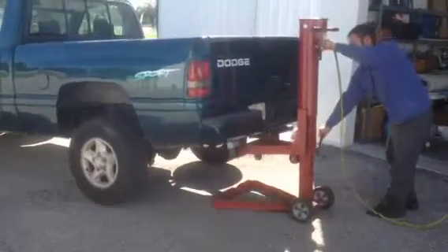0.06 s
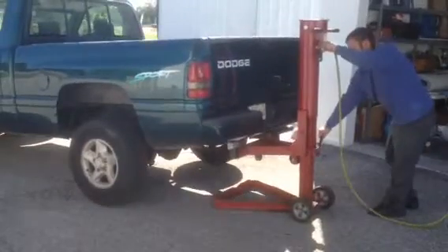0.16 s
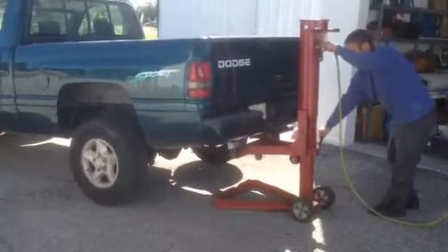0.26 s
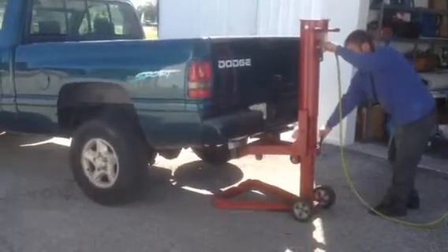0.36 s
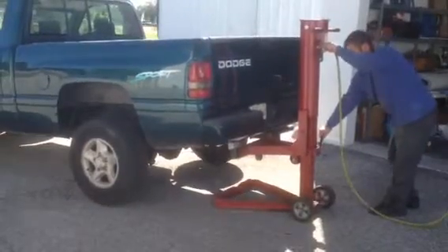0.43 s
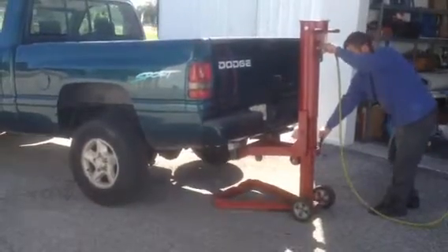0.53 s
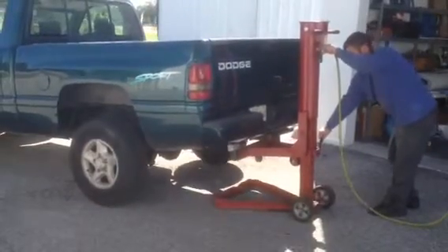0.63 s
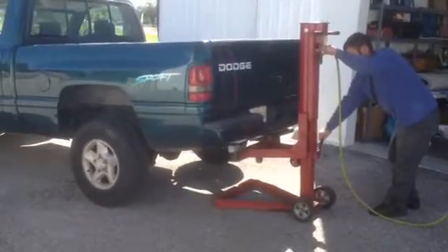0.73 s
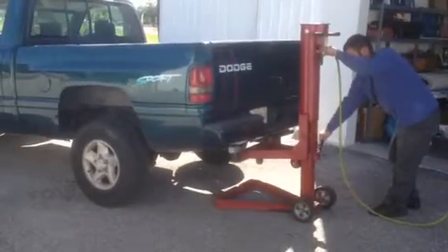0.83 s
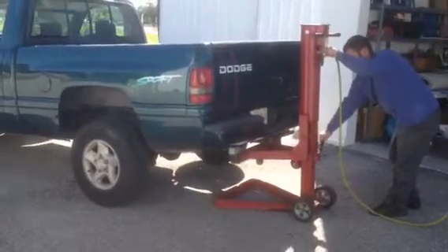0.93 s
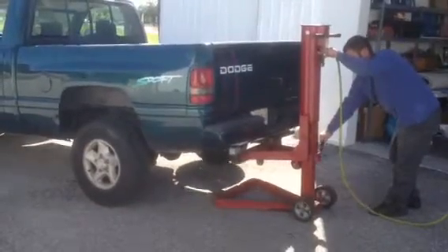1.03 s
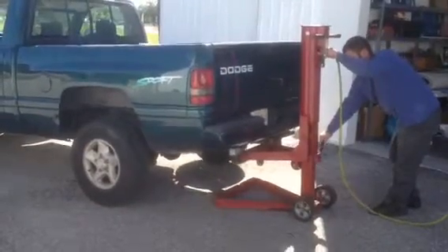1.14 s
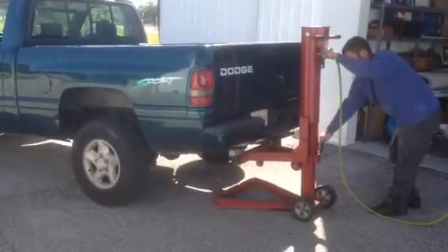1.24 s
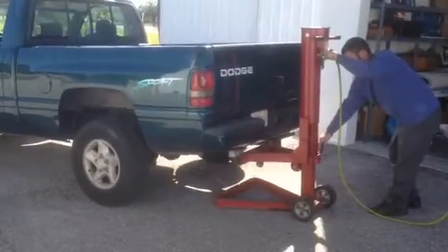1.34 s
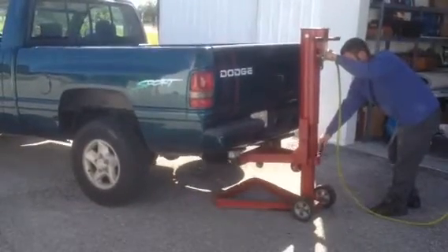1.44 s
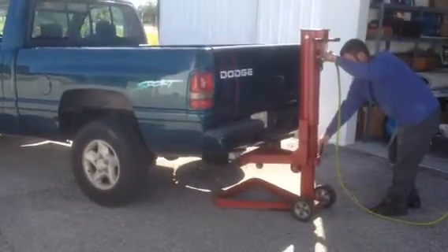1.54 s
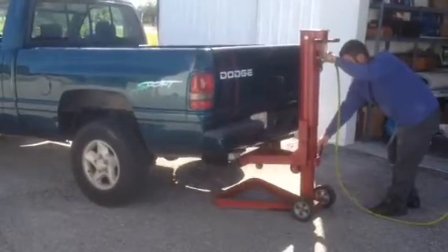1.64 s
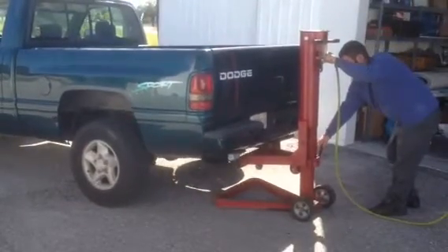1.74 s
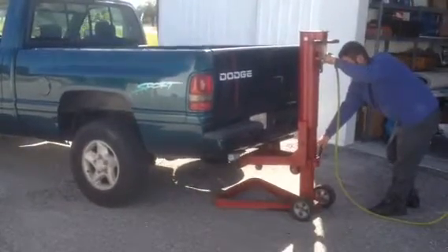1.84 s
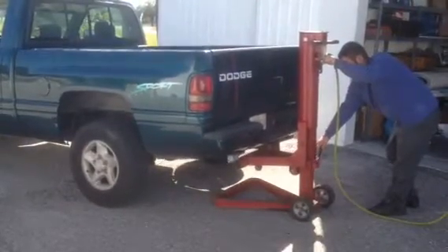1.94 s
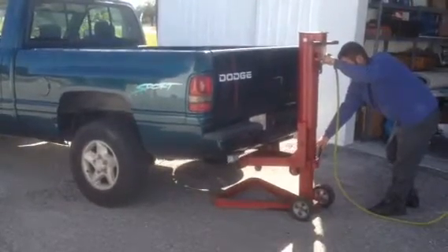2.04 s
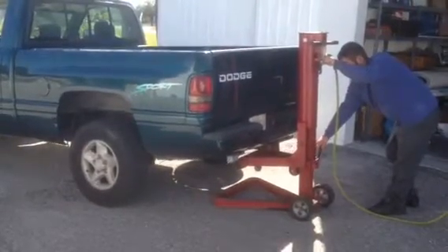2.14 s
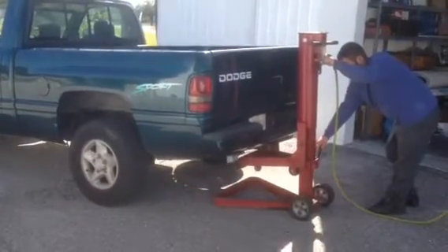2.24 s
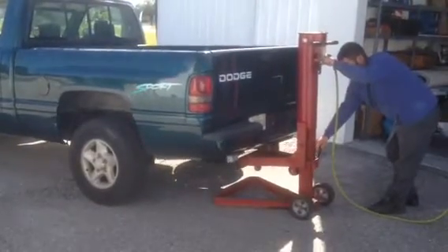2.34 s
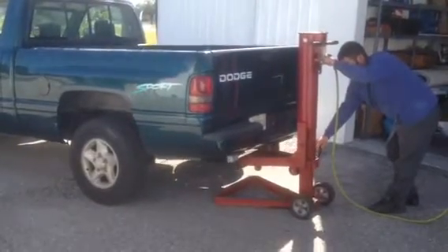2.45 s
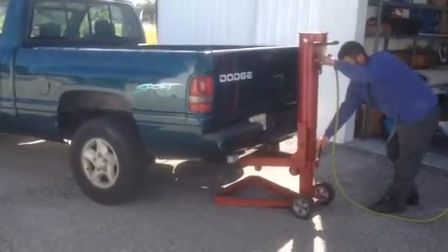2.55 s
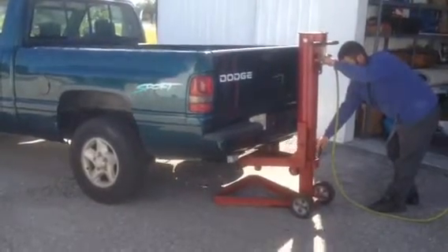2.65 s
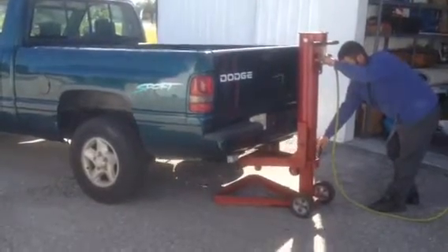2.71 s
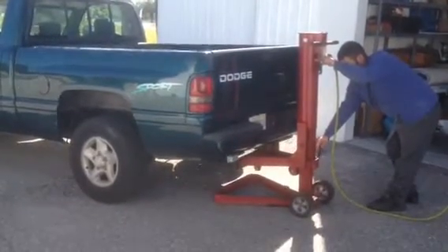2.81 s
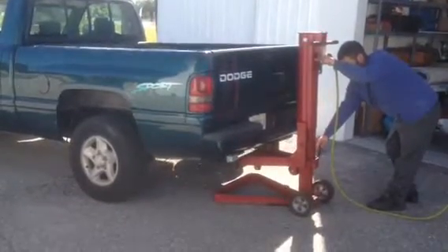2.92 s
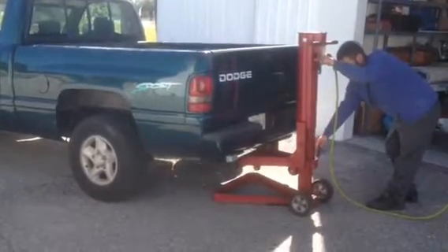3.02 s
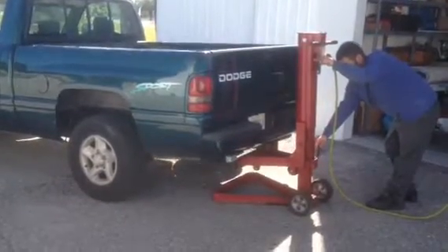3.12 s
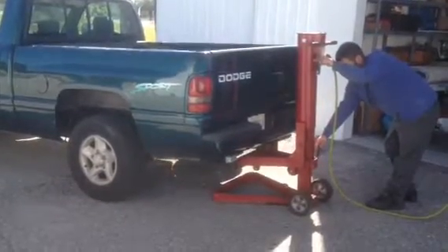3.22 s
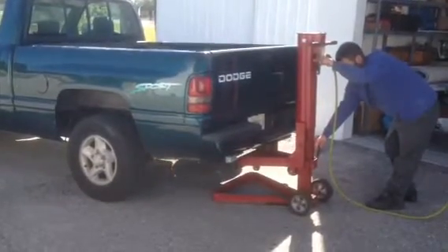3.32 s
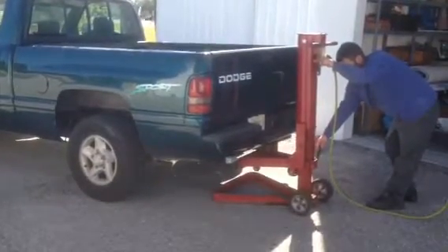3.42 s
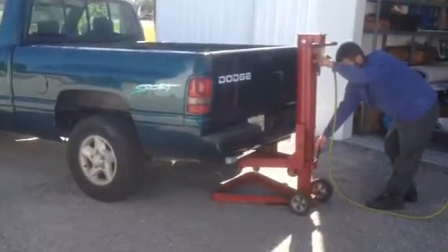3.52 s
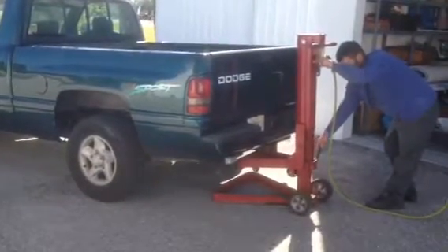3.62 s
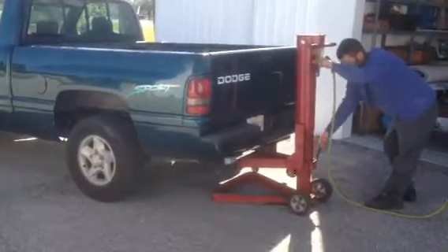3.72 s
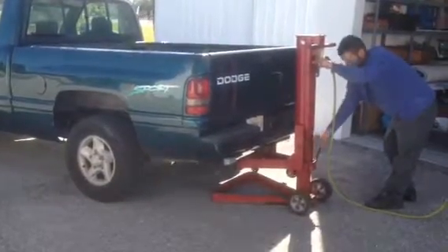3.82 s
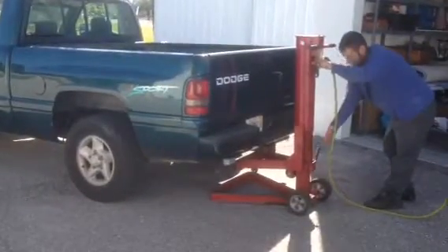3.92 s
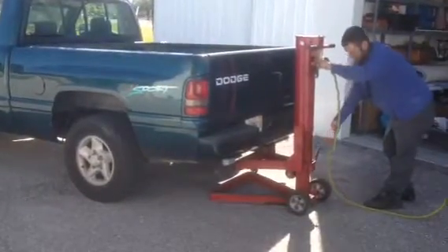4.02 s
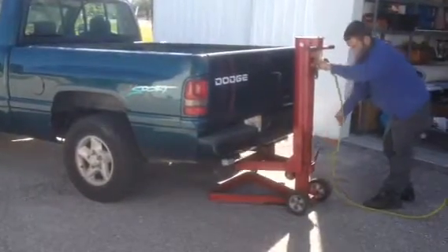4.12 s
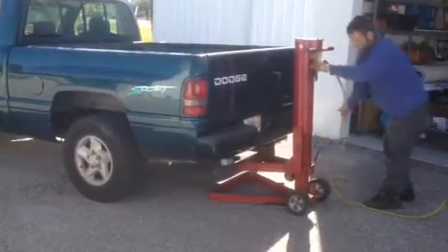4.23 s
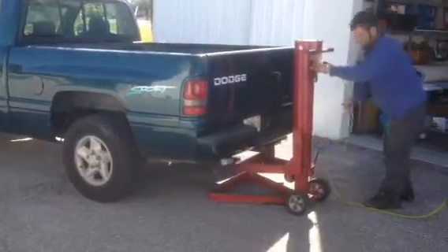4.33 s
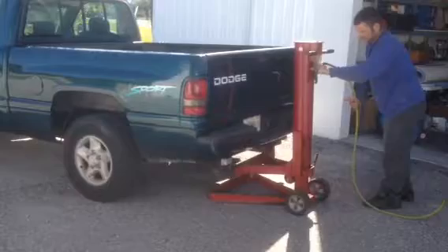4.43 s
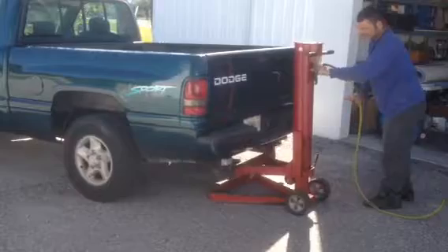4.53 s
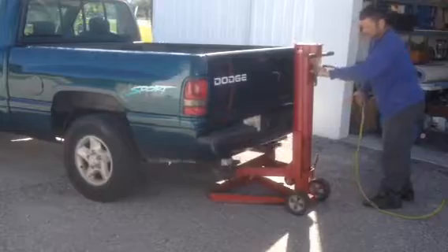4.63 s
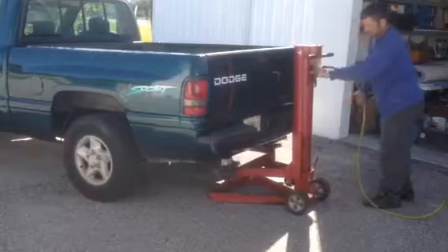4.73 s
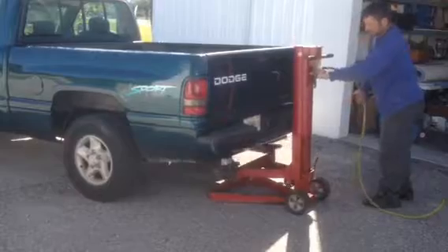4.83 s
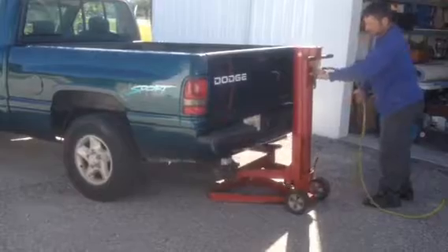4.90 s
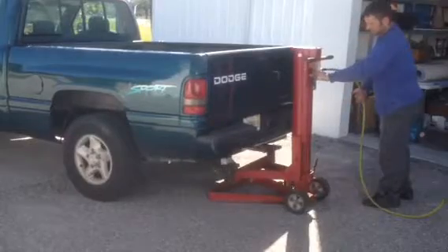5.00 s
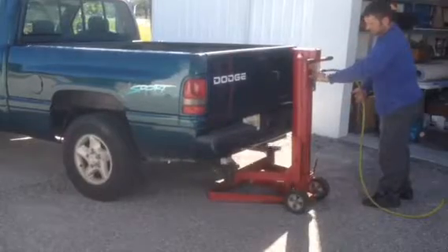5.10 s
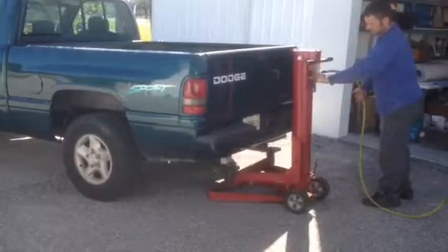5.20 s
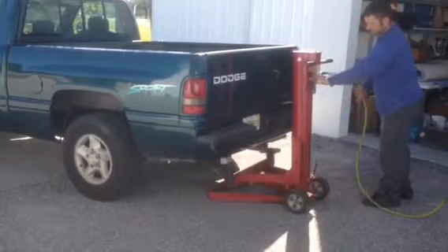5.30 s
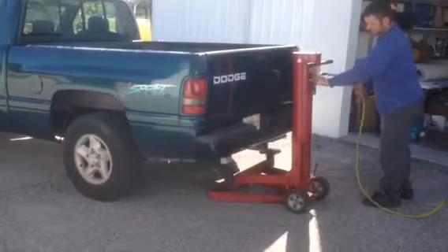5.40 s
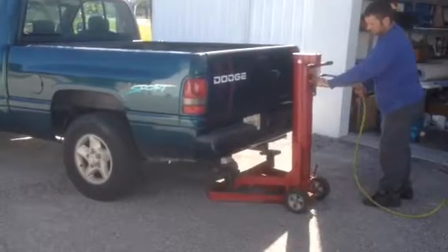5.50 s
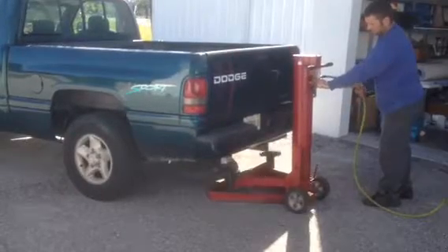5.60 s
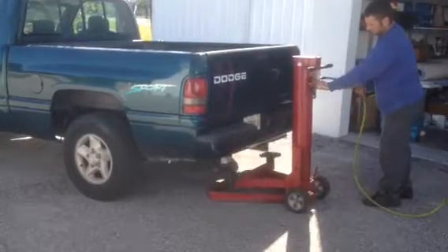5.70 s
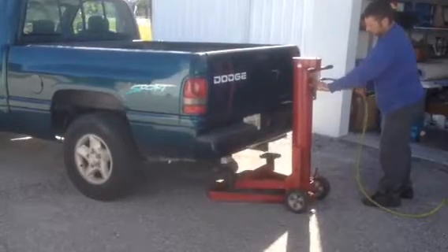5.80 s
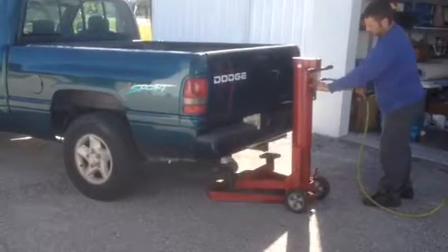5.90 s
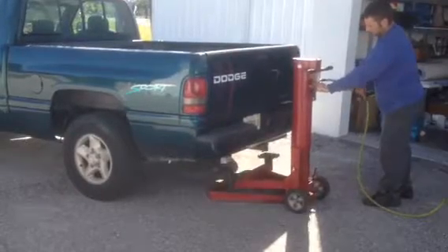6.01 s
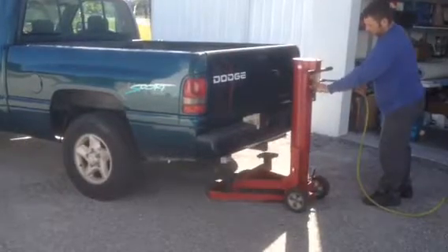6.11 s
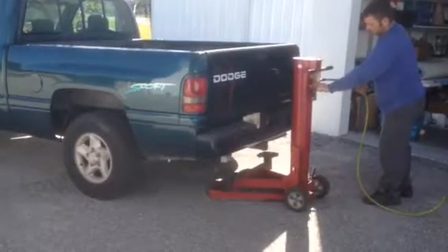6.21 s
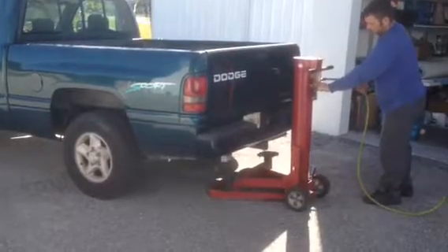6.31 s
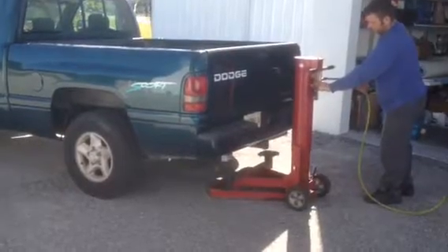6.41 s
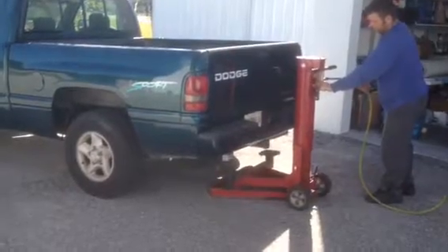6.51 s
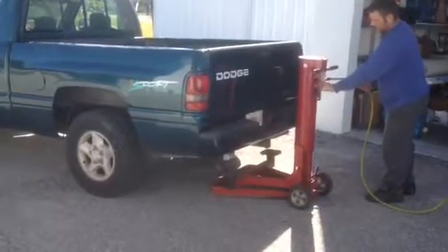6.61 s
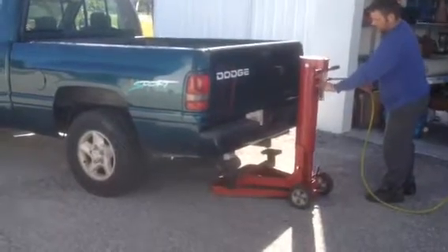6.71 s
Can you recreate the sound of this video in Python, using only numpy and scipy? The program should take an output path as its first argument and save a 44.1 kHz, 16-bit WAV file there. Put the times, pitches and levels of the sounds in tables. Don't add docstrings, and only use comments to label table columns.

```python
import sys
import numpy as np
from scipy import signal
from scipy.fft import rfft, irfft
from scipy.io import wavfile
from scipy.ndimage import uniform_filter1d

SR = 44100
rng = np.random.default_rng(int(sys.argv[2]) if len(sys.argv) > 2 else 0)


def boost(x):
    u = np.asarray(x, float) / 20
    return 10 ** u


def bounce(signal):
    frames = np.transpose(np.atleast_2d(signal))
    limited = np.clip(frames, -1, 1)
    pcm = np.round(limited * 32767).astype(np.int16)
    wavfile.write(sys.argv[1], SR, pcm)


N = 297675
T = np.arange(N) / SR
HZ = np.maximum(np.arange(N // 2 + 1) * SR / N, 1)
FRAME = 2048
TOUCHDOWN_S, STOP_S = 3.75, 5.9


def unit(x):
    return x / np.sqrt(np.mean(x ** 2))


def curves(table, at=T):
    s, *columns = np.transpose(table)
    return [np.interp(at, s, column) for column in columns]


def colour(points, at=HZ):
    hz, db = np.transpose(points)
    return boost(np.interp(np.log(at), np.log(hz), db, left=-90, right=db[-1]))


def walk(rate):
    hold = int(SR / rate)
    steps = np.repeat(rng.standard_normal(N // hold + 1), hold)
    return unit(uniform_filter1d(uniform_filter1d(steps, hold), hold)[:N])


def cycles_at(table):
    total = 0
    for s, db, hz, cycles in table:
        swell = np.exp(-(2.6 * (T - s) * hz / cycles) ** 2)
        total = total + boost(db) * np.cos(2 * np.pi * hz * (T - s)) * swell
    return total


def yard():
    # hz, level_db
    spectrum = [(250, -28), (330, -9), (600, -3), (950, -8), (1300, -2.5), (1450, -1.5), (2000, -7.5),
                (3000, -16), (3600, -20), (4300, -16), (4750, -7.5), (5100, -14), (5700, -17), (7200, -15),
                (8400, -24), (13100, -18), (15300, -24)]
    far = rfft(unit(irfft(rfft(rng.standard_normal(N)) * colour(spectrum), N)))
    low = 1 / (1 + (HZ / 1300) ** 4)
    rise_db = 46 * np.maximum(T - 6.5, 0)
    hum = irfft(far * low, N) * boost(.35 * rise_db)
    hiss = irfft(far * (1 - low), N) * boost(rise_db)
    return (hum + hiss) * boost(-49.5 + 0.6 * walk(10))


def wind():
    # hz, level_db
    buffet = [(15, -67), (25, -32), (81, -11), (183, 2.5), (236, -0.5), (271, -2.5), (352, -6.5),
              (464, -17), (500, -21), (650, -45), (1100, -120)]
    # peak_s, peak_db, half_length_s
    gust_table = [(0.094, -54, 0.038), (.19, -44, 0.039), (0.26, -46, .03), (0.344, -47.5, .045),
                  (0.453, -51.5, 0.021), (.88, -55, 0.13), (1.238, -55, 0.025), (1.503, -57, 0.018),
                  (2.025, -61, .04), (2.77, -59, 0.053), (3.08, -61, .04), (3.3, -63, .05), (3.7, -69, 0.2),
                  (4.102, -58, 0.092), (4.3, -67, 0.091), (4.8, -66, .3), (5.103, -57, .03),
                  (5.22, -57, 0.022), (5.41, -61, .03), (5.8, -67, .3), (6.258, -55, 0.075),
                  (6.437, -61, 0.1), (6.59, -53, 0.04), (6.688, -48, 0.06)]
    lumps = rfft(rng.standard_normal(N) * boost(2.2 * walk(35))) * colour(buffet) * (HZ < 700)
    gusts = 0
    for s, db, half in gust_table:
        gusts = gusts + boost(db) * np.maximum(1 - ((T - s) / (2 * half)) ** 2, 0) ** 4
    breeze = unit(irfft(lumps, N)) * boost(-59.5 + 1.5 * walk(6))
    whistle = unit(irfft(lumps / (1 + (115 / HZ) ** 2), N))
    return breeze + whistle * gusts


def puffs():
    # peak_s, peak_db, pitch_hz, cycles
    table = [
        (6.536, -42, 150, 1.5),
        (6.581, -36, 180, 2.2),
        (6.6, -43, 230, 2.2),
        (6.66, -32, 210, 2.4),
        (6.671, -42, 190, 1.8),
        (6.684, -33, 180, 2.8),
        (6.698, -38, 170, 1.5),
        (6.717, -38, 140, 1.8),
        (6.742, -41, 150, 1.8),
    ]
    return cycles_at(table)


def more_puffs():
    # peak_s, peak_db, pitch_hz, cycles
    table = [(.004, -56, 40, .6), (.15, -58, 35, .7), (1.185, -55, 90, 1.6), (1.265, -66, 35, .7),
             (1.495, -59, 40, .7), (2.1, -64, 45, .7), (4.63, -55, 190, 5), (5.08, -53, 185, 6),
             (3.62, -60, 75, 1.1), (2.23, -60, 75, 1.2), (2.775, -46, 160, 4), (2.82, -56, 80, 1.2),
             (3.115, -49, 200, 5), (3.3, -50, 180, 7), (6.63, -58, 50, .8), (5.2, -64, 45, .7),
             (5.8, -63, 45, .7), (.096, -43, 176, 5.7), (.165, -46, 190, 4), (0.196, -44, 265, 5),
             (.365, -44, 190, 5.5), (.785, -52, 180, 5), (.885, -53, 165, 5), (1.01, -54, 165, 5),
             (1.245, -53, 130, 2)]
    return cycles_at(table)


def plates():
    # peak_s, peak_db, pitch_hz, cycles
    table = [(4.055, -40, 441, 18), (4.05, -37, 720, 14), (4.075, -41, 630, 24), (4.08, -45, 250, 9),
             (6.17, -26, 580, 14), (6.186, -32, 600, 8), (6.163, -32, 760, 10), (6.18, -30, 1510, 40),
             (6.174, -31, 2085, 40), (6.168, -30, 1300, 22), (6.186, -31, 1190, 30), (6.186, -33, 2320, 35),
             (6.2, -35, 420, 10), (6.2, -33, 1800, 30), (6.25, -33, 740, 28), (6.222, -38, 560, 14)]
    return cycles_at(table)


def carriage():
    # start_s, level_db, push_ms, upper_modes_db
    knocks = [
        (4.033, -45, 13, -8),
        (4.06, -44.5, 29, -12),
        (5.975, -36.5, 9.3, -8),
        (6.157, -29, 4.5, -4),
        (6.164, -34, 9, 10),
        (6.235, -39, 9.4, -2),
    ]
    # pitch_hz, level_db, t60_s
    modes = [(256, -0.5, 0.82), (290, 1.5, 0.74), (336, -14, 0.17), (412, -19, 0.16), (451, -4, 0.28),
             (549, 2.5, 0.13), (580, -1, .1), (631, 3.5, 0.061), (690, 2.5, 0.07), (753, -1, 0.16),
             (840, -16, .1), (955, -8.5, 0.21), (1220, -4, .08), (1320, -4, .08), (1460, -1, 0.11),
             (1515, -0.5, .08), (1760, 0, 0.11), (1930, -3, .08), (2050, -2, 0.06), (2500, -9, .08)]
    t, rattle, clunk = T[:SR], rng.standard_normal(N), 0
    for upper in (False, True):
        push = np.zeros(N)
        for s, db, ms, upper_db in knocks:
            age = np.maximum(T - s, 0) * 1000 / ms
            push += boost(db + upper * upper_db) * age * np.exp(1 - age)
        ring = np.zeros(SR)
        for hz, db, t60 in modes:
            if (hz > 900) == upper:
                ring += boost(db) * np.sin(2 * np.pi * hz * t) * 1000 ** (-t / t60)
        if upper:
            scrape_band = signal.butter(2, (1000, 2200), "band", fs=SR, output="sos")
            ring += boost(1.5) * signal.sosfilt(scrape_band, rattle[-SR:]) * 1000 ** (-t / .1)
        clunk = clunk + boost(-32.5) * signal.fftconvolve(push * rattle, ring)[:N]
    return signal.sosfilt(signal.butter(2, 420, "high", fs=SR, output="sos"), clunk)


def landed(s):
    settle_s = .7
    return np.clip((s - TOUCHDOWN_S) / settle_s + .5, 0, 1)


def balance(level_db, opening):
    lost = level_db + 18.5
    tail = np.maximum(-26.5 - level_db, 0)
    hum_db = -20 - 0.59 * lost + 3 * opening
    ring_db = -9.5 + 0.5244 * tail + 4.5 * opening
    fizz_db = 4 + 0.45 * lost - 1.6 * tail + 2.5 * opening
    return hum_db, ring_db, 0, np.maximum(fizz_db, -7)


def sliding(hz, s):
    # from_s, to_s, from_hz, to_hz, lift_db
    sliding_bands = [(-0.5, 1.4, 3000, 2940, 5), (1, 2.8, 3100, 3060, 6), (3.5, 2.5, 2900, 2930, -4),
                     (2.2, 4.2, 2120, 2050, -7), (1, 2.2, 1710, 1710, -7), (2.6, 3.8, 1560, 1620, 3),
                     (1.6, 4.1, 11900, 12350, 3.5), (2.1, 4.3, 12900, 13350, 2), (2.7, 4.2, 11350, 11500, 3.5),
                     (3, 4.3, 10900, 11700, 0), (1.2, 3.6, 10300, 12000, 1.5), (1.5, 5.9, 8200, 8200, 2),
                     (3, 2.9, 6550, 6700, 2), (3.5, 5.07, 6000, 7300, -8), (3.5, 3.5, 4730, 4750, 2),
                     (-1.5, 4.1, 7880, 9800, 4), (3.5, 4.1, 6900, 8700, -1), (3.2, 4.3, 14000, 14200, 4),
                     (-1, 3.7, 13350, 12000, 1.5), (3, 3.6, 12500, 14000, 2), (0.5, 2.8, 8150, 8050, -4.5),
                     (4, 4, 13900, 13650, -3), (5, 4.4, 2250, 2300, -1.5), (2, 4.6, 3450, 3900, -3.5),
                     (-0.5, .7, 4600, 4600, -5), (3.7, 4.9, 8400, 10150, -2.5), (2.5, 3.8, 2640, 2600, -4),
                     (0.5, 1.1, 4100, 4100, 3.5), (0, 2.35, 3900, 3830, 5.5), (2.5, 3.7, 12600, 12700, 4),
                     (3.05, 3.55, 14980, 14980, -4), (3.1, 3.4, 14450, 14200, -3),
                     (3.2, 5.6, 2740, 3100, 6), (4.3, 6.2, 2600, 2850, 5), (4.8, 5.8, 2830, 2980, -5),
               (4.5, 6.2, 2480, 2680, -4), (5.2, 6.2, 2440, 2540, 5), (3.6, 5.9, 1440, 1680, -4),
               (4.6, 5.9, 11350, 11950, 7), (4.5, 6, 11000, 11500, -6), (4.5, 5.4, 12150, 12350, 3.5),
               (4.6, 6.3, 13300, 13450, 4), (5, 6, 13750, 13900, -5), (3.4, 4.4, 6700, 6950, 4),
               (3.9, 4.9, 6550, 6700, 4.5), (4, 5.3, 7150, 7300, 4), (5.3, 6.4, 7050, 7200, 3),
               (4.2, 5.2, 4550, 4800, 3), (5.68, 5.95, 4480, 4700, 5.5), (5.4, 5.6, 4600, 4600, 2),
               (3.4, 6.3, 5650, 5780, -5), (4.5, 6.2, 8750, 8900, -4), (4.95, 5.25, 5300, 5350, 4),
               (5.35, 5.65, 5200, 5200, -4), (4.7, 4.9, 6050, 6050, 4), (3.5, 4.7, 3750, 3800, -4),
               (4.8, 6, 8150, 8300, 1.5), (4.6, 5.9, 14250, 14500, -4), (3.8, 4.5, 13700, 13800, -3),
               (5.2, 6, 9800, 9900, -3), (4.4, 5, 5000, 5100, -3), (5.75, 6, 4880, 4900, 5),
                     (.9, 2.7, 8800, 9250, -4), (.1, .75, 5200, 5200, -3), (.15, .75, 4350, 4350, -3),
               (.4, 1.2, 3850, 3850, -2.5), (.85, 1.7, 1950, 1950, -3), (3, 3.7, 1550, 1500, -3),
               (3.1, 3.8, 2600, 2800, -3), (3.1, 3.7, 760, 760, 3), (2.2, 4.2, 5150, 5320, 3),
               (4.3, 5.5, 5550, 5600, -3), (5.9, 6.6, 4820, 4820, 3), (3.9, 4.6, 3760, 3760, 2.5),
               (.8, 3.3, 13350, 13450, 4), (0, 3.3, 15250, 15250, 3.5), (1.3, 4.1, 13800, 14050, -3),
               (4.6, 6.5, 10950, 11450, 3), (3.6, 5.3, 12500, 12800, 2.5), (4.2, 5.3, 14450, 14300, 3),
               (5.6, 6.6, 12600, 12900, 3), (5.4, 6.6, 13900, 14000, 3), (4.5, 5.3, 12200, 12250, -3),
               (4.2, 4.8, 8450, 8450, -2.5), (0, .7, 12600, 12600, -2), (3, 4.5, 7600, 7550, 2),
               (0, 2.2, 14300, 14250, 2)]
    lift_db = np.zeros((len(hz), len(s)))
    for start, end, from_hz, to_hz, db in sliding_bands:
        on = (s > start - .3) & (s < end + .3)
        along = (s[on] - start) / (end - start)
        centre_hz = from_hz + (to_hz - from_hz) * along
        off_centre = (hz - centre_hz) / (50 + .02 * from_hz)
        lift_db[:, on] += db * np.exp(-(2.2 * along - 1.1) ** 4 - 2.8 * off_centre ** 2)
    return lift_db


def echoes(hz, s):
    # start_ms, loaded_drift_ms_per_s, touchdown_ms, free_drift_ms_per_s
    path_table = [
        (.484, .007, .535, -.016),
        (.89, -.014, .9, -.065),
        (1.11, -.016, 1.03, -.055),
        (1.225, .002, 1.24, -.028),
        (2.565, -.073, 2.69, -.17),
    ]
    # start_share, loaded_gain_per_s, free_share
    share_table = [
        (0.045, 0.016, 0.031),
        (0.012, 0.022, 0.026),
        (0.019, 0.019, 0.023),
        (0.17, 0.012, 0.074),
        (0.013, .002, 0.03),
    ]
    # hz, level_db
    scatter = [(500, -12), (4000, -9), (10000, -8), (14000, -5.5)]

    def late(ms):
        return np.exp((-2j * np.pi * hz * ms / 1000).astype(np.complex64))

    bright = np.clip(hz / 9000, .7, 1.15)
    free = landed(s)
    moving_s = np.minimum(s, STOP_S)
    run_s = moving_s - TOUCHDOWN_S
    strong = 0
    for path, shares in zip(path_table, share_table):
        ms, drift, free_ms, free_drift = path
        share, gain, free_share = shares
        lag_ms = (1 - free) * (ms + drift * s) + free * (free_ms + free_drift * run_s)
        level = (1 - free) * (share + gain * s) + free * free_share
        strong = strong + level * late(lag_ms)
    chance = rng.random((9, 4))
    shrink = 1 - .0165 * moving_s
    small_share = np.minimum(.5 + .13 * s, 1.2)
    small = 0
    for lag, size, rate, turn in chance:
        sway_ms = .012 * np.sin(2 * np.pi * ((.3 + rate) * s + turn))
        small = small + (size - .5) * late(lag * 10 * shrink + sway_ms)
    weak = colour(scatter, hz) * small_share * small * np.sqrt(12 / len(chance))
    return 1 + bright * strong + weak


def jet():
    # time_s, jet_db, opening (0-1)
    vent = [(0, -19, 0), (.18, -18.5, 0), (.43, -19.5, 0.43), (.7, -18, 0), (1.9, -21.5, 1),
            (2.57, -21.5, 1), (3.0, -24, 1.05), (3.48, -25, 0.78), (3.75, -25.5, 0.66), (4.25, -27.5, 0.36),
            (4.4, -26.5, 0.42), (5.36, -26.5, 0.39), (5.95, -26.5, 0.33), (6.02, -29, 0.5),
            (6.13, -31.5, 0.2), (6.21, -30, 0.8), (6.43, -54, 0), (6.75, -55, .3)]
    # hz, level_db
    spectrum = [(150, -64), (250, -32), (480, -16.5), (751, -6.5), (923, -16), (1040, -11.5), (1870, -9.5),
                (3020, -8), (3530, -7), (4720, -6), (5710, -6.5), (7260, 0.5), (9230, -1), (12200, 7),
                (15200, -1)]
    region_hz = (750, 2000, 5600, 11600)
    # pitch_hz, width_hz, loaded_lift_db, free_lift_db
    column = [(448, 116, -11.5, -10.5), (676, 42, -8, -4), (770, 84, 4.5, 2.5), (860, 70, -3, 2),
              (897, 65, -1, 3), (1286, 43, 8, 3), (1399, 32, 9, 6.5), (1526, 31, 2.5, 1),
              (1926, 130, 6, 3.5), (2328, 61, 5.5, -0.5), (2900, 320, 2, 2)]
    # pitch_hz, width_hz, loaded_lift_db, free_lift_db
    housing = [(3310, 160, -4.5, -2.5), (3630, 630, -3.5, -6.5), (4300, 150, 2, 1), (4660, 420, 3.5, 3.5),
               (5340, 110, 4, 2.5), (5610, 120, -3.5, -0.5), (6830, 120, 2, -4), (7000, 340, 0, 2.5),
               (8460, 320, -0.5, 2.5), (8240, 980, 1, -2.5), (10800, 4300, 0.5, -0.5),
               (12400, 500, -3, -0.5), (12800, 240, 1.5, -2), (14700, 830, 5, 1)]
    air = rng.standard_normal(N) * boost(0.4 * walk(900) + 0.19 * walk(9))
    hz, s, cells = signal.stft(air, SR, nperseg=FRAME, noverlap=FRAME * 3 // 4)
    hz = np.maximum(hz, 1)[:, None]
    free = landed(s)
    shut_lift = 0.63
    loaded = (1 - free) * (shut_lift + (1 - shut_lift) * curves(vent, s)[1])
    pitch, width, loaded_db, free_db = np.transpose(column + housing)
    resonance = 1 / (1 + (2 * (hz - pitch) / width) ** 2)
    lift_db = resonance @ (np.outer(loaded_db, loaded) + np.outer(free_db, free))
    lift_db = lift_db + sliding(hz, s)
    cells = cells * colour(spectrum, hz) * boost(lift_db) * echoes(hz, s)
    level_db, opening = curves(vent)
    frames = np.minimum(s * SR, N - 1).astype(int)
    shaped = 0
    for k, rel_db in enumerate(balance(level_db, opening)):
        region = cells * np.interp(np.log(hz), np.log(region_hz), np.eye(4)[k])
        power = np.mean(np.sum(np.abs(region) ** 2, axis=0))
        shaped = shaped + region * boost(rel_db + 0.74 * walk(14))[frames] / np.sqrt(power)
    hiss = signal.istft(shaped, SR, nperseg=FRAME, noverlap=FRAME * 3 // 4)[1][:N]
    shut_db = -72 * np.maximum(T - 6.33, 0)
    return hiss * boost(level_db + shut_db - 2.0)


def walls(x):
    # lag_ms, share
    surfaces = [(3.52, -0.03), (4.06, -0.05), (5.22, 0.03), (6.68, -0.04), (8.72, -0.04), (9.42, 0.04),
                (9.66, -0.03), (17.42, 0.04), (18.18, -0.06), (18.62, -0.03), (19.2, -0.05), (21.8, 0.04)]
    dull = signal.sosfiltfilt(signal.butter(2, 5500, fs=SR, output="sos"), x)
    return x + 1.6 * sum(share * np.roll(dull, round(ms * SR / 1000)) for ms, share in surfaces)


def scene():
    mono = walls(jet() + carriage()) + wind() + puffs() + more_puffs() + plates() + yard()
    return np.array([mono, mono])


def camera(x):
    # hz, level_db
    masked = [(3000, -11), (5500, -7.2), (8000, -7), (13000, -5.5), (13500, -2.7), (14600, -2.5),
              (15200, -3.3)]
    hz, s, cells = signal.stft(x, SR, nperseg=FRAME // 2, noverlap=FRAME * 3 // 8)
    hz = np.maximum(hz, 1)[:, None]
    power = uniform_filter1d(np.abs(cells) ** 2, size=8, axis=1)
    quiet = np.clip(np.mean(power) / np.mean(power, axis=0), .3, 9) ** .16
    limit = colour(masked, hz) ** 2 * quiet * uniform_filter1d(power, size=40, axis=0)
    kept = (uniform_filter1d(power, size=3, axis=0) > limit) & (hz < 15330)
    return signal.istft(cells * kept, SR, nperseg=FRAME // 2, noverlap=FRAME * 3 // 8)[1][:N]


def swapped(x):
    # centre_s, low_hz, high_hz
    swaps = [(0.403, 6300, 8300), (1.216, 11000, 12400), (1.218, 5700, 6900), (1.31, 13900, 15200),
             (1.312, 4200, 5600), (1.589, 5700, 6800), (1.636, 6900, 9600), (1.637, 11700, 13100),
             (1.798, 4200, 6300), (2.056, 6300, 9600), (2.193, 5300, 7600), (2.335, 7600, 9000),
             (2.519, 5200, 6300), (2.891, 4700, 5700), (3.471, 9600, 11700), (3.727, 7700, 9000),
             (3.796, 8300, 9600), (4.306, 6800, 8300), (4.584, 5200, 6200), (5.885, 6300, 7600),
             (6.489, 5200, 6200), (6.65, 4300, 6300)]
    side, span = np.zeros(N), np.arange(FRAME)
    hz = np.arange(FRAME // 2 + 1) * SR / FRAME
    for s, low_hz, high_hz in swaps:
        at = int(s * SR) - FRAME // 2 + span
        band = irfft(rfft(x[at][::-1]) * (hz > low_hz - 60) * (hz < high_hz + 60))
        side[at] += 0.58 * np.sin(np.pi * span / FRAME) * band
    return side


def roll_off(x):
    return signal.sosfilt(signal.butter(12, 16500, fs=SR, output="sos"), x)


def record(dry):
    mid = camera(dry[0])
    side = swapped(mid)
    return roll_off(np.array([mid + side, mid - side]))


dry = scene()
out = record(dry)
bounce(out)
```